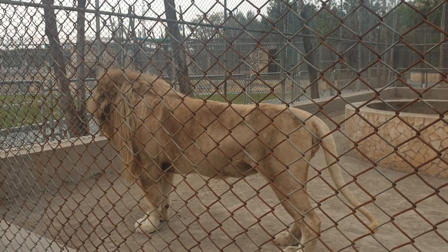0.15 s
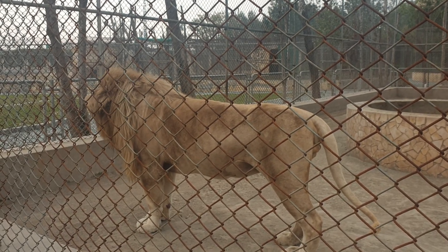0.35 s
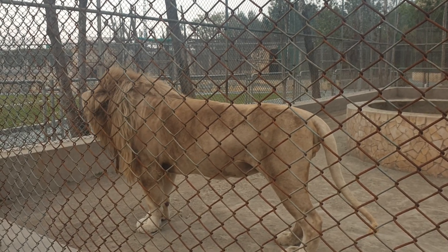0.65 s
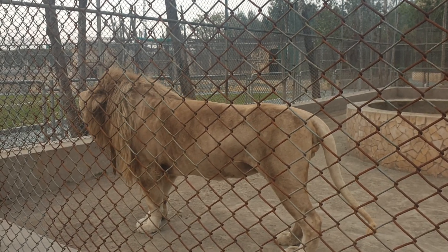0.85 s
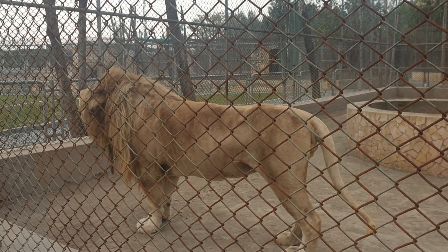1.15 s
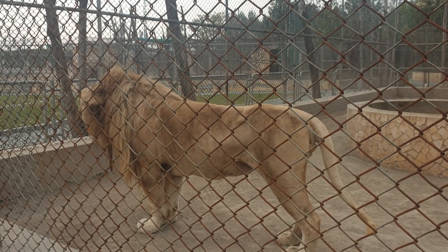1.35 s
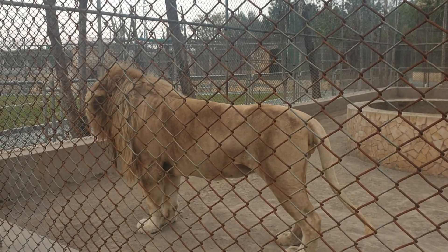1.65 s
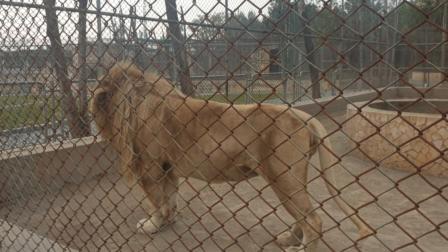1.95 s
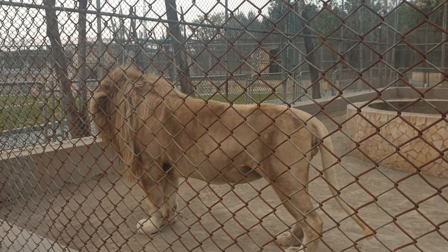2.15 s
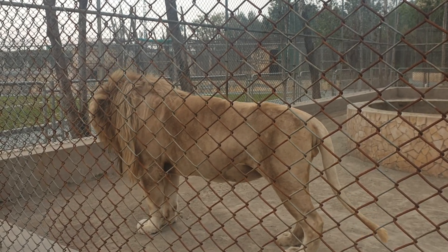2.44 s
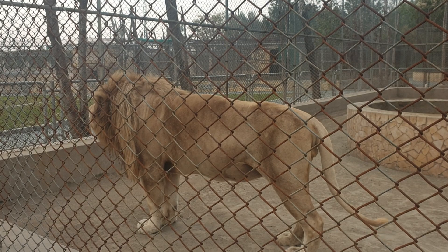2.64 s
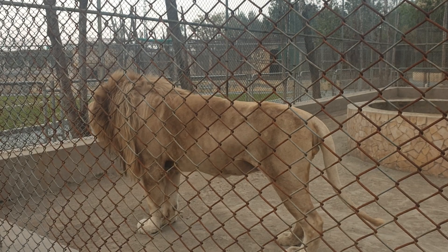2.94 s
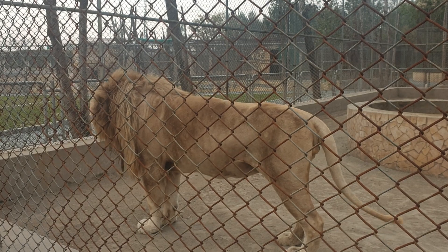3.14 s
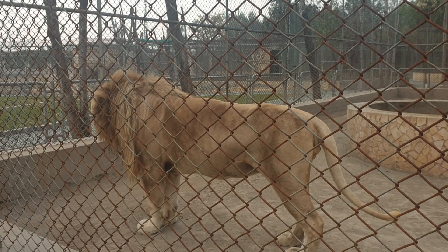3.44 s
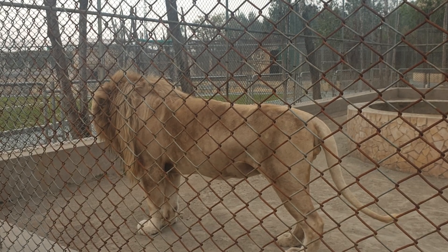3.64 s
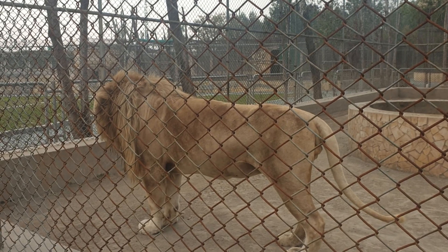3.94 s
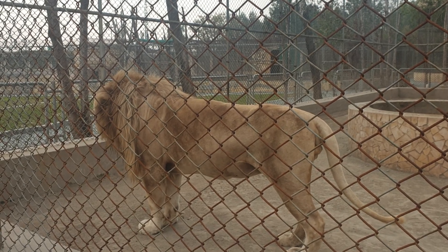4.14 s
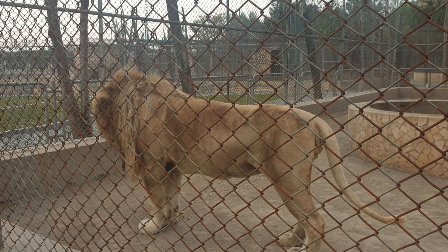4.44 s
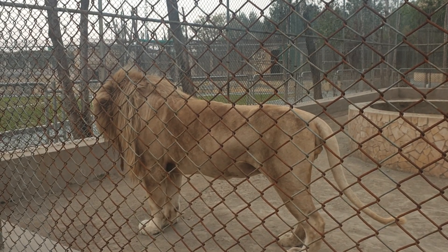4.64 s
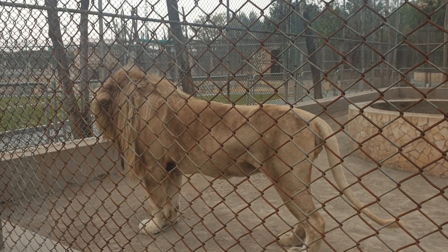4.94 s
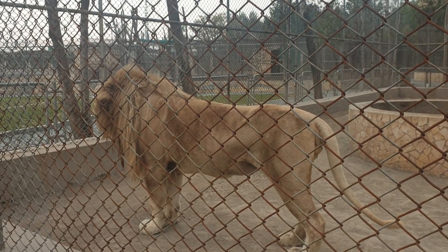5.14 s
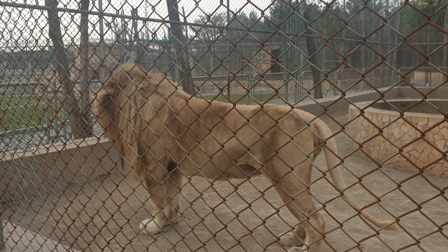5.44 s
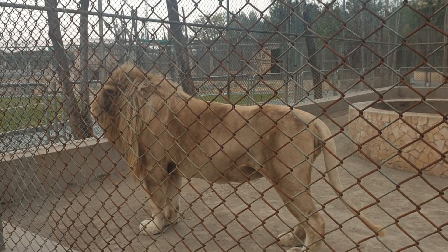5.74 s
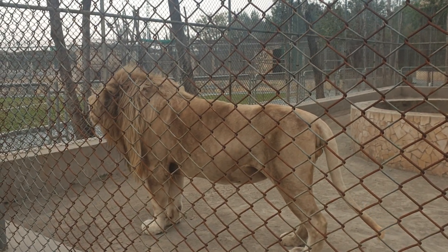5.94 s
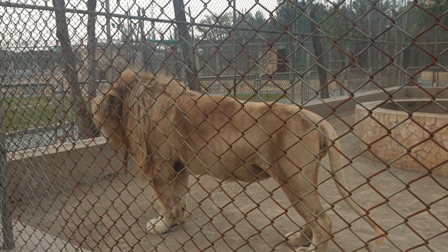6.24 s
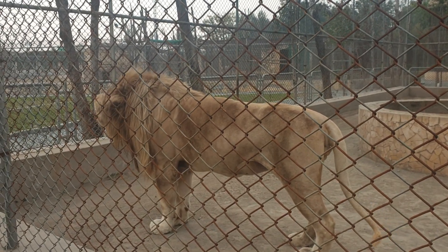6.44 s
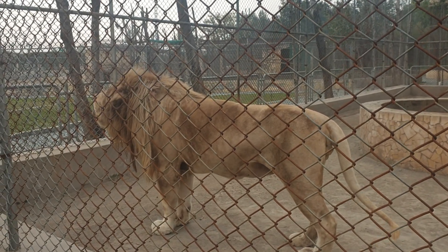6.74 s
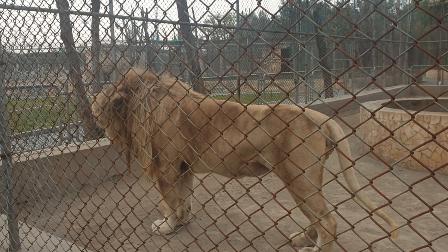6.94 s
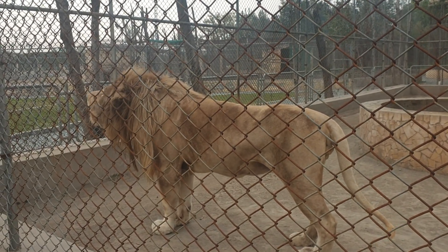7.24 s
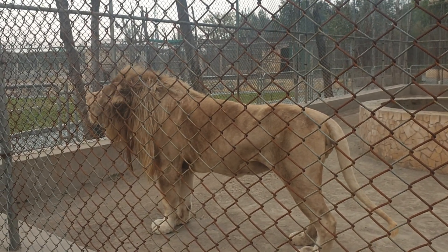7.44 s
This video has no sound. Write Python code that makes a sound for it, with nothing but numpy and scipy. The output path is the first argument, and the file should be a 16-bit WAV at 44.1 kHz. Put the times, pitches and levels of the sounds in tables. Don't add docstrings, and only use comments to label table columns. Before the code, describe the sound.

A lion calls close by in a fenced concrete yard. From 0 s a low, throbbing moan swells, and at about 0.6 s it breaks into a loud, hoarse roar sliding steadily down, fraying into raspy breath and dying by 1.7 s. Quiet outdoor air follows, with low distant traffic, a faint engine hum and a barely audible fence tick near 2.4 s. At 2.9 s comes a short rising bark and sinking grunt, over by about 3.3 s, while a far car's tyres hiss softly. A soft low hum runs from 3.2 s, tightens into a pulsing tone at 4.2 s and bursts into a second roar at 4.5 s, falling and roughening until 5.4 s. Another lull holds faint insects and a small tick at 5.7 s. From 6.4 s to the end a chesty, fluttering growl rattles with irregular throat knocks, pushing harder around 7.3 s. Short bright reflections surround the voice.

```python
import sys
import numpy as np
from scipy import signal
from scipy.fft import rfft, irfft, next_fast_len
from scipy.io import wavfile
from scipy.ndimage import uniform_filter1d, map_coordinates

SR = 44100
rng = np.random.default_rng(int(sys.argv[2]) if len(sys.argv) > 2 else 0)


def how_loud(loudness_db):
    steps = np.asarray(loudness_db, float) / 20
    return 10 ** steps


def master(y):
    cut = np.clip(np.atleast_2d(y).T, -1, 1)
    pcm = np.round(cut * 32767)
    wavfile.write(sys.argv[1], SR, pcm.astype(np.int16))


N = 334278

# [t/s, pitch f/Hz, level/dB]
MOAN = [(0.0, 60, -38.5), (0.268, 61.9, -36), (0.37, 60.8, -39.5), (0.47, 56.3, -29.5)]
# [t/s, pitch f/Hz, level/dB]
FALL_HIGH = [(0.63, 225.1, -21.5), (.69, 223.8, -22), (.8, 216.9, -20), (.88, 199.5, -15.5),
             (.97, 191.7, -18), (1.0, 173.7, -12)]
# [t/s, pitch f/Hz, level/dB]
FALL_LOW = [(1.051, 155.8, -11.5), (1.146, 152.6, -12.5), (1.234, 151.7, -17), (1.299, 135.9, -22.5),
            (1.34, 142.1, -23), (1.51, 100.7, -25.5), (1.63, 101.6, -34), (1.66, 99, -52)]
# [t/s, pitch f/Hz, level/dB]
GRUNT = [
    [(2.885, 109.8, -36), (2.925, 114.9, -35.5), (2.945, 120, -16.5), (3.012, 134.3, -25),
     (3.055, 146.6, -23)],
    [(3.05, 139.7, -24), (3.066, 123.3, -15.5), (3.17, 118.4, -18.5)],
]
# [t/s, pitch f/Hz, level/dB]
HUM = [(3.2, 74.74, -39.5), (3.262, 71.33, -30), (3.412, 72.5, -38), (3.606, 80.7, -33), (4.016, 81.4, -31),
       (4.098, 75.83, -35), (4.392, 78.4, -29), (4.47, 76.5, -21.5)]
# [t/s, pitch f/Hz, level/dB]
SLIDE = [(4.485, 217.8, -23), (4.52, 214.1, -19), (4.75, 195.8, -12), (4.996, 157.9, -19.5),
         (5.11, 149.3, -25), (5.312, 107.6, -29), (5.39, 95.4, -30.5), (5.42, 93, -38)]
# [t/s, pitch f/Hz, level/dB]
GROWL = [(6.38, 120.4, -27), (6.436, 117, -23.5), (7.072, 126.5, -25), (7.22, 128.9, -19.5),
         (7.288, 128.8, -21.5), (7.41, 120.5, -20), (7.446, 115.7, -26.5), (7.55, 105.6, -31),
         (7.57, 100.5, -66)]
# [multiple of the pitch, level/dB]
MOAN_ORDERS = [(1, -20.5), (2, -8), (3, -1.5), (4, -19.5), (5, -34), (6, -3), (7, -10), (8, -17.5),
               (9, -24), (10, -4.5), (11, -11.5)]
# [multiple of the pitch, level/dB]
FALL_ORDERS = [(1, 0), (2, 8), (3, -3.5), (4, -12), (5, -20)]
# [multiple of the pitch, level/dB]
BARK_ORDERS = [(1, 0), (2, -27), (3, 1.5), (4, -30.5), (5, -45), (6, -14.5), (7, -29.5), (8, -11), (9, -56)]
# [multiple of the pitch, level/dB]
GRUNT_ORDERS = [(1, -14), (2, -10.5), (3, 1.5), (4, -17.5), (5, -16.5), (6, -13), (7, -16), (8, -22.5),
                (9, -18), (10, -35), (11, -28), (12, -20.5)]
# [multiple of the pitch, level/dB]
HUM_ORDERS = [(1, -27), (2, -5), (3, 0), (4, -6.5), (5, -8), (6, -16), (7, -2), (8, -19.5), (9, -21),
              (10, -26), (11, -36.5), (12, -26.5), (13, -32.5), (14, -43.5), (15, -22), (16, -25),
              (17, -24), (18, -22), (19, -27.5), (20, -34.5)]
# [multiple of the pitch, level/dB]
SLIDE_ORDERS = [(1, 0), (2, -3), (3, -10.5), (4, -23.5), (5, -14.5), (6, -29), (7, -45)]
# [pitch f/Hz, level/dB there, dB per Hz]
OVERTONES = [
    (60, 3, -3),
    (225.8, 4, 0.38),
    (121, -4, 0),
    (123, 14, -1.5),
    (78.06, 3, 2),
    (210, -3.5, 0.5),
    (120, -23, -1.5),
]
# [unsteadiness at first 0-1, frays from t/s, unsteadiness at the end 0-1]
FRAY = [
    (.14, 0, .16),
    (.12, 1.22, .7),
    (.11, 3, .4),
    (.06, 3.1, .2),
    (.045, 4.03, .25),
    (.06, 4.76, .45),
    (.14, 7.2, .55),
]
# [t/s, f/Hz, level/dB, waver share]
LOCKED = [
    [(0.08, 370, -38.5, 0.012), (.36, 368, -15.5, 0.015), (0.434, 349, -13.5, .012),
     (0.45, 343, -12.5, .02)],
    [(0.45, 343.7, -17, 0.035), (0.644, 344.7, -15, 0.028), (0.68, 360, -22, .03)],
    [(4.18, 334.7, -27.5, 0.025), (4.242, 335.2, -12.5, 0.022), (4.478, 354.6, -11.5, 0.027),
     (4.52, 310, -23.5, .03)],
]
# [t/s, peak level/dB]
THROBS = [(4.194, -15), (4.216, -11), (4.236, -9), (4.26, -9), (4.283, -9), (4.305, -7), (4.33, -5),
          (4.355, -6), (4.389, -7), (4.42, -6), (4.465, -7)]
# [t/s, peak level/dB]
PUSHES = [(0.206, -22), (0.24, -17), (0.296, -15), (0.363, -12), (0.39, -13), (0.415, -10), (0.489, -11),
          (0.541, -7), (0.583, -5), (0.631, -10), (0.676, -16)]

# [t/s, level/dB, mouth opening 0-1]
STREAM = [
    [(0, -55.5, 0.9), (.3, -43.5, 0.2), (.438, -39, 0), (.55, -37.5, 0.21), (.68, -36, 0.4),
     (.73, -33, 0.56), (.784, -36, 0.53), (1.0, -34, 0.65), (1.324, -41, 0.87), (1.38, -34.5, 0.75),
     (1.588, -46.5, 0.57), (1.68, -73, 0.7)],
    [(2.86, -75, 0.5), (2.938, -42.5, 0.6), (3.0, -42, .6), (3.02, -36.5, 0.7), (3.11, -35.5, .7),
     (3.142, -42, 0.23), (3.4, -62, 0.2)],
    [(3.401, -56, 0.2), (3.95, -55.5, 0.2), (4.274, -40.5, 0.4), (4.468, -33, 0), (4.516, -41.5, 0),
     (4.782, -40.5, 0.4), (4.96, -39.5, 0.38), (5.05, -42, 0.9), (5.14, -36.5, 0.67), (5.29, -41, 0.75),
     (5.42, -67, 0.3)],
    [(6.36, -81, 0.6), (6.4, -45, 0.5), (6.5, -41, 0.98), (7.23, -39.5, 0.83), (7.376, -30.5, 0.7),
     (7.444, -40.5, 0.8), (7.58, -53.5, 0.7)],
]
# [t/s, level/dB over the steady stream]
FLAPS = [(.09, 7), (.21, 8), (.243, 8), (.548, -2), (.586, -1), (.719, 4), (.745, 3), (.845, 6), (.869, 0),
         (.943, 5), (1.042, 4), (1.2, 4), (1.288, 1), (1.366, 9), (1.453, 8), (2.941, 2), (3.013, 12),
         (4.186, 6), (4.497, 4), (4.966, 2), (5.072, 10), (5.132, 13), (5.146, 9), (5.192, 4), (5.243, 5),
         (5.29, 2), (6.393, 7), (6.407, 9), (6.422, 7), (6.488, 5), (6.532, 5), (6.587, 4), (6.612, 3),
         (6.628, 5), (6.67, 7), (6.733, 4), (6.801, 10), (6.879, 7), (6.945, 14), (7.019, 8), (7.098, 15),
         (7.162, 9), (7.244, 7), (7.258, 6), (7.29, 3), (7.333, 4), (7.348, 2), (7.428, 6), (7.452, 6),
         (7.48, 5), (7.504, 6)]
# [t/s, f/Hz, sharpness level/dB]
TONGUE = [(0, 572, 0.5), (.45, 575, 7), (.75, 565, -4.5), (1.0, 623, -0.5), (1.28, 823, -2.5),
          (1.4, 618, -12.5), (1.6, 892, 0), (2.9, 716, 2.5), (3.05, 632, -5.5), (3.22, 755, -1),
          (4.1, 552, -1), (4.85, 621, -1), (5.08, 788, -7.5), (5.2, 769, -3), (5.3, 910, 0),
          (6.4, 675, 5.5), (6.55, 731, 0.5), (7.22, 692, 3.5), (7.35, 553, -10.5)]
# [f/Hz, width/Hz, level/dB]
UPPER = [(1004, 154, 7), (1330, 390, 0), (1569, 230, -3), (1958, 420, -3.5), (2369, 250, -13.5)]
# [frequency ratio, level/dB]
SHUT = [(1.033, -0.5), (.95, 1.5), (.96, 4), (1.004, -12), (1, 3)]
# [t/s, end t/s, level/dB]
HOLDS = [
    (.17, .48, -13),
    (3.055, 3.185, -16),
    (3.45, 4.06, -16),
    (4.2, 4.5, -11),
    (4.5, 4.77, -18),
    (4.77, 4.94, -5),
]
# [f/Hz, level/dB per Hz]
BREATH = [(1590, -39.5), (2700, 1.5), (3590, -4.5), (3950, -3.5), (4850, -6), (5570, -8), (9090, -22.5),
          (12400, -23.5), (15500, -31.5)]
# [t/s, level/dB]
LEAK = [(0, 4.5), (.8, -6.5), (1.08, 5.5), (1.3, 0), (1.45, 3.5), (2.92, 3), (3.15, -1), (3.4, 5),
        (3.65, 8), (3.9, 10), (4.45, -3.5), (4.85, 4), (5.05, -0.5), (5.15, 5), (5.4, -1), (6.6, 3),
        (7.58, 2)]
# [t/s, depth 0-1]
NOSE = [(0, 0.8), (1.25, 1), (1.4, 1), (2.9, 0.1), (4.3, 0), (4.5, 1), (5.4, 0.9), (6.4, 0.4), (7.2, 0.1),
        (7.3, 0.77)]
# [t/s, length/s, start f/Hz, end f/Hz, level/dB]
SINGS = [(.235, 0.07, 630.4, 570, -32.5), (.64, .05, 1675, 1700, -42.5), (1.04, .035, 1685, 1690, -42),
         (1.05, 0.1, 2390, 2374, -49), (1.19, 0.033, 2004, 2020, -51), (.45, 0.29, 1075, 1082, -38),
         (.33, 0.47, 1214, 1200, -40.5), (.84, 0.1, 752, 797, -37), (.95, 0.043, 599, 635, -38),
         (1.04, 0.067, 608, 635, -30.5), (1.17, .14, 729, 830, -35.5), (1.18, 0.086, 970, 1027, -37),
         (1.5, 0.14, 901, 889, -45.5), (2.935, 0.11, 1010, 989, -30), (3.02, 0.043, 2170, 2180, -52.5),
         (3.1, 0.036, 2580, 2540, -50), (3.0, .04, 535, 593, -29.5), (3.045, 0.036, 629, 642, -25),
         (3.01, 0.11, 1362, 1335, -37), (3.1, .12, 720, 852, -37.5), (3.165, 0.029, 366, 472, -23.5),
         (3.19, 0.096, 474, 455, -28), (4.0, 0.25, 1473, 1462, -48.5), (4.2, .16, 1495, 1432, -39.5),
         (4.27, 0.22, 2250, 2326, -49.5), (4.39, 0.1, 2400, 2466, -51.5), (4.495, 0.044, 575, 570, -28.5),
         (4.69, .06, 1018, 978, -32), (4.72, 0.074, 1410, 1330, -39.5), (4.75, .08, 1148, 1102, -37),
         (4.76, 0.11, 979, 953, -38), (4.865, .065, 370, 405, -20), (4.96, 0.1, 671, 788, -33),
         (4.96, 0.035, 1361, 1340, -40.5), (5.06, 0.046, 751, 819, -36), (5.21, .05, 770, 760, -35),
         (7.33, 0.065, 382.6, 411, -17.5)]
# [t/s, half width/s, depth 0-1]
BREAKS = [(.46, .014, 0.2), (.53, .006, 0.3), (0.706, 0.003, 0.7), (.825, 0.027, 0.4), (0.924, 0.015, 0.68),
          (1.025, 0.016, 0.6), (1.168, 0.014, 0.63), (1.264, 0.016, 0.5), (4.845, 0.0063, 0),
          (4.942, 0.0078, 0.6), (5.04, 0.018, 0.5), (5.113, 0.0071, 0.1)]
# [t/s, level/dB]
WHEEZES = [(1.07, -52), (4.74, -62), (4.78, -64), (4.81, -61), (4.85, -67), (4.89, -53), (4.97, -65),
           (2.908, -58), (2.958, -51.5), (2.985, -58), (3.018, -48.5), (3.04, -53), (3.058, -56.5),
           (3.075, -61), (3.11, -63)]
# [peak t/s, level/dB]
RUMBLES = [
    (1.501, -23.5),
    (5.194, -24),
    (6.619, -26.5),
    (7.39, -23),
]
# [t/s, length/s, level/dB, change/dB]
BODY = [
    (1.199, 0.48, -19.5, -32),
    (2.901, 0.35, -27, -20),
    (4.95, .45, -24, -12.5),
    (6.412, 1, -24, 0),
]
# [t/s, beats per s, depth 0-1]
FLUTTER = [(6.38, 47, 0.31), (6.9, 50, 0.21), (7.25, 52, .4), (7.4, 66, 0)]
# [t/s, peak level/dB]
KNOCKS = [(6.488, -30), (6.53, -23.5), (6.673, -24.5), (6.732, -34.5), (6.8, -27.5), (6.88, -23),
          (6.945, -24), (7.018, -21.5), (7.099, -18), (7.161, -14)]
# [f/Hz, level/dB, t60/s]
TUBE = [(444, 4.5, 0.14), (734, -2.5, 0.25), (997, -6, .11), (1330, -14, .06), (1540, -7.5, 0.096)]

# [f/Hz, level/dB per Hz]
AIR = [(240, -21.5), (400, -3.5), (480, -6.5), (620, -10), (900, -9), (1300, -14), (1800, -10), (3000, -21),
       (5000, -30), (8000, -40), (9000, -60), (12000, -65), (15700, -65)]
# [f/Hz, level/dB per Hz]
TRAFFIC = [(15, -48), (25, -19), (49, 3.5), (128, 3), (153, -1.5), (340, -13), (479, -39.5), (600, -14.5),
           (780, -58.5), (1320, -120)]
# [t/s, level/dB]
ROAD = [(0, -34), (1.9, -40.5), (3.4, -34.5), (5.3, -42), (6.3, -38.5), (7.58, -46)]
# [f/Hz, level/dB]
ENGINE = [(61, -54), (95, -63), (123, -44.5), (181, -59), (298, -58.5), (352, -58.5)]
# [f/Hz, correlation -1 to 1]
ALIKE = [(60, 0.98), (130, 0.99), (290, 0.65), (640, 0.042), (1410, -0.36), (3100, 0.15), (6820, -0.059),
         (15000, -0.22)]
# [t/s, level/dB]
TICKS = [
    (2.39, -70),
    (5.67, -59),
]
# [f/Hz, level/dB difference]
TILT = [(60, 2), (380, 2.4), (700, 0), (1290, 1), (2380, -2.5), (4400, .5), (8120, 5), (15000, 3)]
# [f/Hz, phase/rad]
LEAD = [(0, 0), (160, .06), (260, .12), (400, .5), (750, 1), (900, 1.8), (1050, 2.05), (1810, 2.4),
        (2500, 1), (4570, 4.8), (7410, 12.8), (15200, 32.4)]


def unit(x):
    return x / np.sqrt(np.mean(x ** 2) + 1e-20)


def along(points, hz):
    f, v = np.transpose(points)
    return np.interp(np.log(hz + 1), np.log(f + 1), v)


def curves(*tables):
    t = np.arange(N) / SR
    s, *cols = np.transpose(np.vstack(tables))
    gate = 0
    for rows in tables:
        inside = np.minimum(t - rows[0][0] + .006, rows[-1][0] + .006 - t)
        gate = gate + np.clip(inside / .012, 0, 1)
    return [np.interp(t, s, c) for c in cols] + [gate]


def wobble(rate):
    knots = rng.standard_normal(int(N * rate / SR) + 4)
    return map_coordinates(knots, [np.arange(N) * rate / SR])


def filtered(x, response):
    m = next_fast_len(N + SR // 2)
    return irfft(rfft(x, m) * response(np.fft.rfftfreq(m, 1 / SR)), m)[..., :N]


def ring(x, hz, width_hz):
    turn = np.exp(2j * np.pi * np.cumsum(np.broadcast_to(hz, N)) / SR)
    pole = np.exp(-np.pi * width_hz / SR)
    smooth = signal.lfilter([1], np.convolve([1, -pole], [1, -pole]), x / turn)
    return unit(np.real(turn * smooth))


def surges(events, lift_db, rise, fall, flip=1):
    kicks, t = np.zeros(N), np.arange(SR // 5) / SR
    s, db = np.transpose(events)
    kicks[(s * SR).astype(int)] = how_loud(db + lift_db) * flip ** np.arange(len(s))
    shape = (1 - np.exp(-t / rise)) * np.exp(-(t / fall) ** 2)
    gain = 1 + signal.fftconvolve(kicks, shape)[:N]
    return gain / np.sqrt(np.abs(uniform_filter1d(gain ** 2, SR // 6)))


def peak(s, db, rise_db, fall_db):
    t = np.arange(N) / SR - s
    return db - np.where(t < 0, -rise_db * t, fall_db * t)


def voiced(table, orders, lead, guide, overtones, fray):
    hz, level_db, gate = curves(table)
    at_hz, over_db, slope_db = overtones
    over_db = np.maximum(over_db + slope_db * (hz - at_hz), -27)
    lead_db = level_db - np.maximum(over_db, 0)
    over_db = level_db + np.minimum(over_db, 0)

    clean, since, frayed = fray
    progress = np.clip((np.arange(N) / SR - since) / (table[-1][0] - since), 0, 1)
    ragged = clean + (frayed - clean) * np.sqrt(progress)
    phase = 2 * np.pi * np.cumsum(hz * (1 + .15 * ragged * wobble(45))) / SR
    lost_db = 9 * np.clip(ragged - .1, 0, 1)
    guide_db = dict(orders)[guide]
    stack = 0
    for k, db in orders:
        partial_db = lead_db if k == lead else over_db + db - guide_db
        partial_db = partial_db - lost_db * max(k - guide, 0) + 11.3 * ragged * wobble(75)
        stack = stack + how_loud(partial_db) * np.sin(k * phase + k * k)
    return np.sqrt(2) * gate * stack


def locked_tone():
    hz, db, waver, gate = curves(*LOCKED)
    tone = np.sin(2 * np.pi * np.cumsum(hz * (1 + waver * wobble(70))) / SR)
    throb = surges(THROBS, lift_db=34, rise=.01, fall=.018, flip=-1)
    push = surges(PUSHES, lift_db=19, rise=.006, fall=.03)
    return np.sqrt(2) * np.minimum(gate, 1) * how_loud(db - 2.0) * push * throb * tone


def tones():
    stacks = [
        (MOAN, MOAN_ORDERS, 2, 3),
        (FALL_HIGH + FALL_LOW, FALL_ORDERS, 1, 2),
        (GRUNT[0], BARK_ORDERS, 1, 3),
        (GRUNT[1], GRUNT_ORDERS, 1, 3),
        (HUM, HUM_ORDERS, 5, 3),
        (SLIDE, SLIDE_ORDERS, 1, 2),
        (GROWL, [(1, 0), (2, 0)], 1, 2),
    ]
    calls = sum(voiced(*s, over, fray) for s, over, fray in zip(stacks, OVERTONES, FRAY))
    return calls + locked_tone()


def pulses(rate):
    openings = np.floor(np.cumsum(rate * how_loud(4 * wobble(60))) / SR)
    ticks = np.diff(openings, prepend=0) * how_loud(2 * wobble(150))
    puff = signal.lfilter([1], [1, -np.exp(-1 / (0.0046 * SR))], ticks)
    noise = unit((0.61 + unit(puff)) * rng.standard_normal(N))
    return 0.55 * unit(ticks) + 0.77 * noise, noise


def forced():
    return sum(how_loud(peak(s, db, rise_db=75.5, fall_db=110)) for s, db in RUMBLES)


def holding():
    t, ease_db = np.arange(N) / SR, 0
    for s, end, db in HOLDS:
        ease_db = ease_db + db * np.clip(np.minimum(t - s, end - t) / .04 + .5, 0, 1)
    return how_loud(ease_db)


def rasp():
    air_db, mouth, gate = curves(*STREAM)
    (second_hz, sharp_db, _), leak_db = curves(TONGUE), curves(LEAK)[0]

    def opened(ends):
        return ends[0] + (ends[1] - ends[0]) * mouth

    source, noise = pulses(rate=110)
    flap = surges(np.subtract(FLAPS, [.004, 0]), lift_db=0, rise=.0007, fall=.02)
    snap = 52 * np.clip(np.diff(flap, prepend=flap[0]), 0, None)
    far = source * flap ** .6
    source = source * flap ** .85 + snap

    ease = holding()
    first_hz = opened((341.6, 435.7))
    first = ring(source, first_hz, width_hz=114.0)
    first = first + how_loud(-7.5) * ring(source, 1.276 * first_hz, width_hz=226)
    second = how_loud(opened((10.5, 2.5)) + sharp_db) * np.sqrt(ease) * ring(source, second_hz, width_hz=74)
    upper = 0
    for k, ((hz, width, db), (ratio, shut_db)) in enumerate(zip(UPPER, SHUT)):
        level = (-1) ** k * how_loud(db + opened((shut_db, -shut_db / 2)))
        centre = hz * opened((ratio, 1)) * (1 + 0.02 * wobble(9))
        upper = upper + level * ring(source if k < 3 else far, centre, width)

    noise = noise + np.array([[1], [-1]]) * pulses(rate=130)[1]
    breath = unit(filtered(noise, lambda f: how_loud(along(BREATH, f))))
    sizzle = filtered(breath, lambda f: 1 / (1 + (7400 / (f + 1)) ** 6))
    sizzle_gain = how_loud(opened((-2, -3)) + leak_db / 2) * (1 + how_loud(19) * forced())
    hiss = flap ** 0.48 * (breath + (sizzle_gain - 1) * sizzle)

    voice = how_loud(opened((27, 5.5))) * ease * first + second + how_loud(3.0) * unit(upper)
    return gate * how_loud(air_db) * (voice + how_loud(opened((-18.5, -15.5)) + leak_db) * hiss)


def nasal(x):
    centre_hz, width_hz = 1525, 110
    band = filtered(x, lambda f: 1j * f * width_hz / (centre_hz ** 2 - f * f + 1j * f * width_hz))
    return x - np.clip(curves(NOSE)[0], 0, 1) * band


def yard(x):
    t = np.arange(SR // 4) / SR
    tails = rng.standard_normal((2, 2, len(t))) * how_loud(-60 * t / .13)
    tails = tails / np.linalg.norm(tails[0, 0])
    turn = 2.5 * wobble(3)
    aims = np.pad([x * np.cos(turn), x * np.sin(turn)], ((0, 0), (90, 0)))
    wet = signal.fftconvolve(aims[:, None], tails, axes=2).sum(axis=0)[:, :N]
    return filtered(wet, lambda hz: how_loud(along([(150, -22), (500, -9), (1200, -2), (8000, 2)], hz)))


def rush(spectrum, patchy_db):
    z = signal.stft(rng.standard_normal((2, N)), nperseg=512)[2]
    field = uniform_filter1d(rng.standard_normal(z.shape[1:]), 6, 0)
    field = uniform_filter1d(field, 14, 1)
    pair = signal.istft(z * how_loud(patchy_db * unit(field)), nperseg=512)[1][:, :N]

    def spread(hz):
        turn = np.arccos(np.clip(along(ALIKE, hz), -1, 1)) / 2
        return how_loud(along(spectrum, hz)) * [np.cos(turn), np.sin(turn)]

    mid, side = filtered(pair, spread)
    return np.array([mid + side, mid - side]) / np.std(mid)


def engine():
    t, hum = np.arange(N) / SR, 0
    for hz, db in ENGINE:
        hum = hum + how_loud(db + 2.0 * wobble(3.5)) * np.sin(2 * np.pi * hz * t + 1.0 * wobble(5))
    return hum


def outdoors():
    traffic = how_loud(0.34 * wobble(7.6)) * rush(TRAFFIC, patchy_db=0.5) + how_loud(41.5) * engine()
    low = how_loud(curves(ROAD)[0]) * traffic * how_loud([[1], [-1]])
    tyre_db = peak(3.1, -47, rise_db=34.5, fall_db=4.5)
    tyres = how_loud(tyre_db) * ring(rng.standard_normal((2, N)), 1776, width_hz=580)
    insects = how_loud(-69 + 2.6 * wobble(25)) * ring(rng.standard_normal((2, N)), 4350, width_hz=700)
    wash = how_loud(-56.5 + 6.0 + 0.37 * wobble(8.2)) * rush(AIR, patchy_db=0.5)
    return wash + low + tyres + insects


def sings():
    out, waver, flicker = np.zeros(N), wobble(60), wobble(40)
    for k, (s, length, from_hz, to_hz, db) in enumerate(SINGS):
        at, u = round(s * SR), np.linspace(0, 1, round(length * SR))
        own = slice(k * SR // 6, k * SR // 6 + len(u))
        hz = (from_hz + (to_hz - from_hz) * u) * (1 + .012 * waver[own])
        swell = np.sqrt(2 * np.abs(np.sin(np.pi * u)))
        tone = np.sin(2 * np.pi * np.cumsum(hz) / SR)
        out[at:at + len(u)] += how_loud(db + 3 * flicker[own]) * swell * tone
    return out


def airflow():
    t, gain = np.arange(N) / SR, 1
    for s, half, depth in BREAKS:
        gain = gain * (1 - np.clip(depth, 0, 1) * np.exp(-((t - s) / half) ** 4))
    return gain


def wheeze():
    level = sum(how_loud(peak(s, db, rise_db=5200, fall_db=650)) for s, db in WHEEZES)
    band = lambda f: 1 / (1 + (4300 / (f + 1)) ** 20 + (f / 5800) ** 20)
    return level * unit(filtered(rng.standard_normal(N), band))


def chest():
    spans = [[(s, db), (s + length, db + change_db)] for s, length, db, change_db in BODY]
    body_db, gate = curves(*spans)
    source = pulses(rate=61)[0]
    ribs = forced() * ring(source, 60, width_hz=100)
    return ribs + gate * how_loud(body_db) * ring(source, 162.0, width_hz=80)


def fence():
    level = sum(how_loud(peak(s, db, rise_db=4000, fall_db=600)) for s, db in TICKS)
    return level * ring(rng.standard_normal((2, N)), 6300, width_hz=1500)


def flutter():
    rate, depth, gate = curves(FLUTTER)
    beat = 2 * np.pi * np.cumsum(rate * (1 + .1 * wobble(30))) / SR
    return 1 + gate * np.clip(depth, 0, 1) * (np.sin(beat) + 0.33 * np.sin(2 * beat))


def chop(lion):
    chopped = (flutter() - 1) * filtered(lion, lambda hz: 1 / (1 + (hz / 260) ** 6))
    return lion + filtered(chopped, lambda hz: 1 / (1 + (95 / (hz + 1)) ** 6))


def stalls():
    t, gain = np.arange(N) / SR, 1
    for s, _ in KNOCKS:
        gain = gain * (1 - .45 * np.exp(-((t - s) / .014 + 1) ** 4))
    return gain


def knocks():
    out, t = np.zeros(N), np.arange(SR // 5) / SR
    chances = rng.standard_normal((len(KNOCKS), len(TUBE), 2))
    for (s, db), chance in zip(KNOCKS, chances):
        ringing = 0
        for (hz, level, t60), (size, pitch) in zip(TUBE, chance):
            mode = np.sin(2 * np.pi * hz * (1 + .012 * pitch) * t)
            ringing = ringing + how_loud(level + 2 * size - 60 * t / t60) * mode
        out[round(s * SR):][:len(t)] += how_loud(db - 6) * ringing * (1 - np.exp(-t / .001))
    return out


def scene():
    voice = airflow() * nasal(tones() + stalls() * rasp() + sings())
    lion = chop(voice + chest() + wheeze() + knocks())
    side = np.array([[.5], [-.5]])
    lead = lambda hz: np.exp(1j * side * np.interp(hz, *np.transpose(LEAD)))
    tilt = lambda hz: how_loud(side * along(TILT, hz))
    placed = filtered(filtered(lion, lead) + yard(lion.mean(axis=0)), tilt)
    return placed + outdoors() + fence()


def roll_off(x):
    return signal.sosfilt(signal.butter(12, 15650, fs=SR, output="sos"), x)


def record(dry):
    bass_cut = lambda hz: ((1j * hz / 45) ** 2 / (1 + 1.2j * hz / 45 - (hz / 45) ** 2)) ** 2
    x = filtered(dry, bass_cut)
    mix = x / (1 + np.abs(x / .93) ** 4) ** (1 / 4)
    return roll_off(mix)


dry = scene()
out = record(dry)
master(out)
```